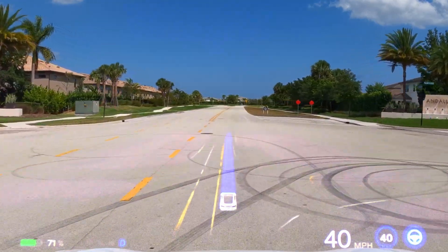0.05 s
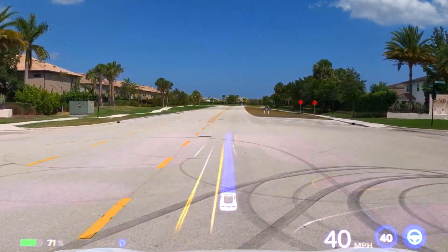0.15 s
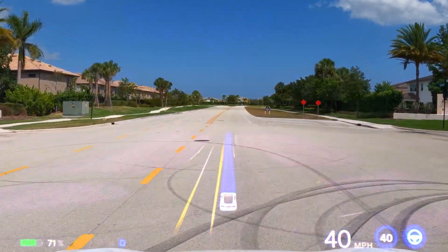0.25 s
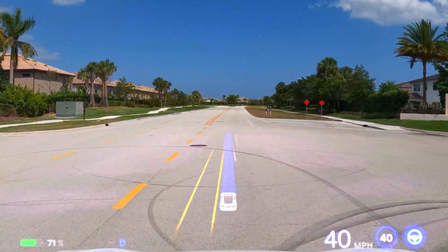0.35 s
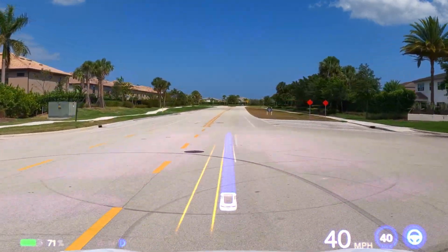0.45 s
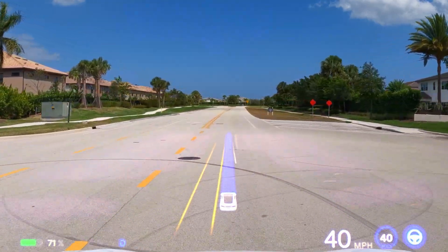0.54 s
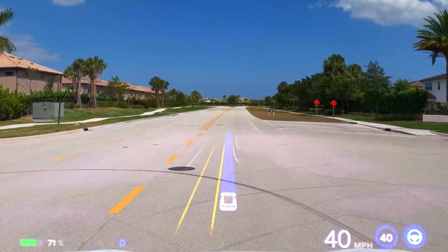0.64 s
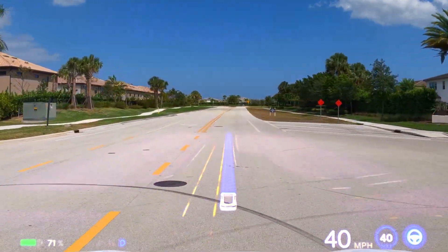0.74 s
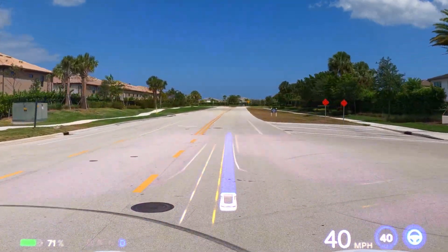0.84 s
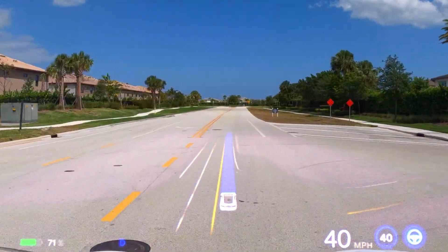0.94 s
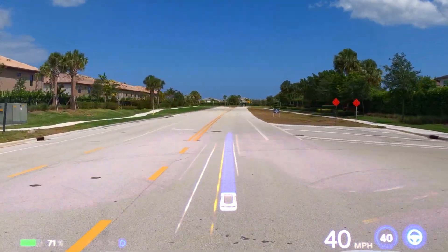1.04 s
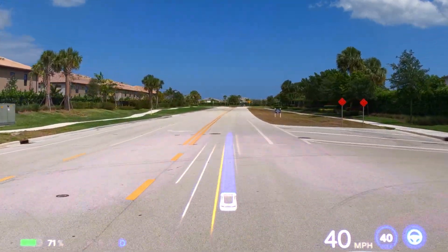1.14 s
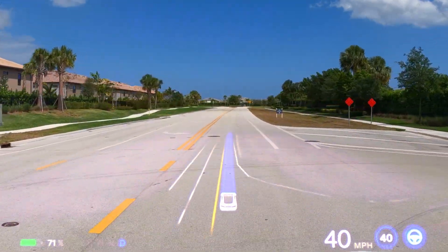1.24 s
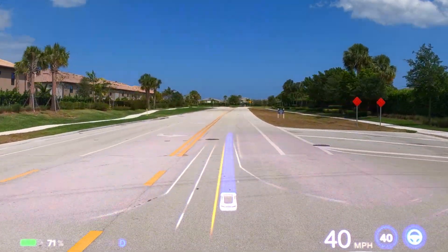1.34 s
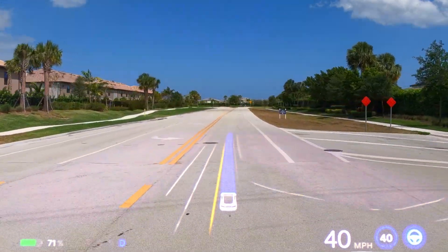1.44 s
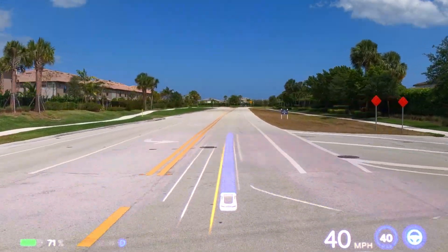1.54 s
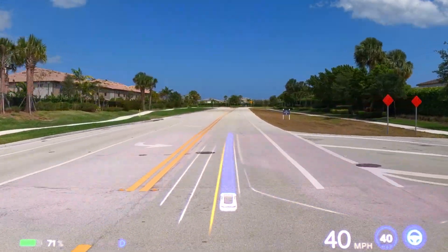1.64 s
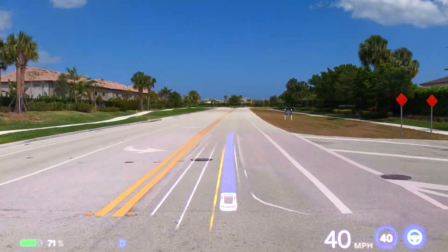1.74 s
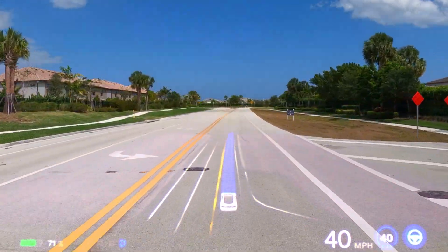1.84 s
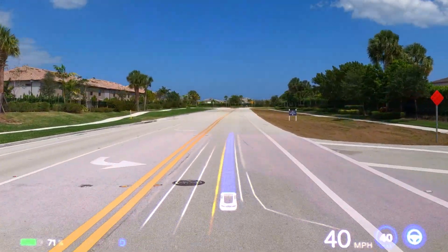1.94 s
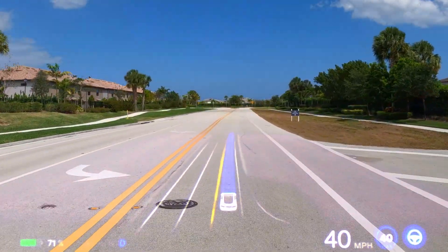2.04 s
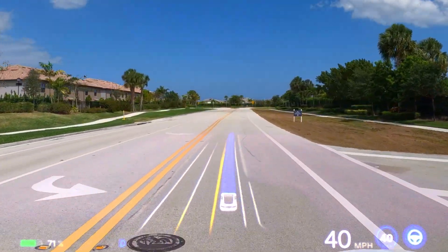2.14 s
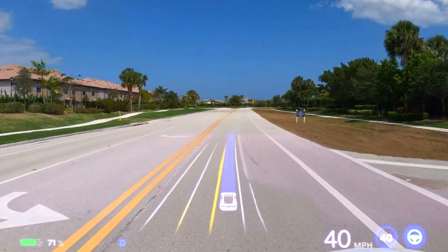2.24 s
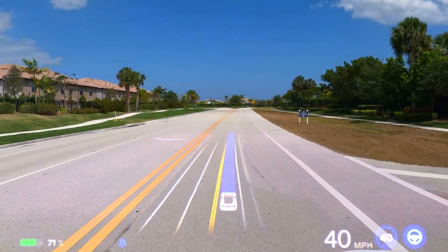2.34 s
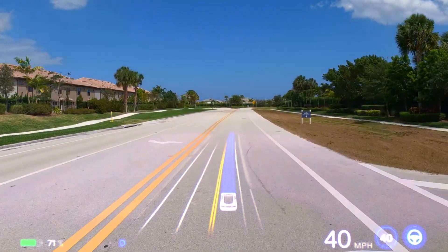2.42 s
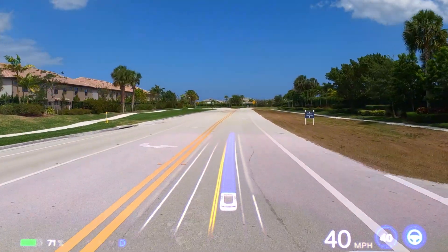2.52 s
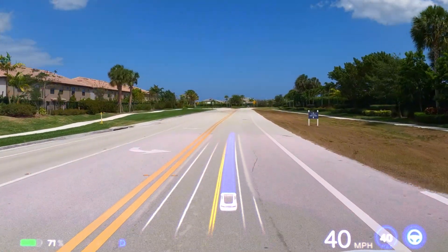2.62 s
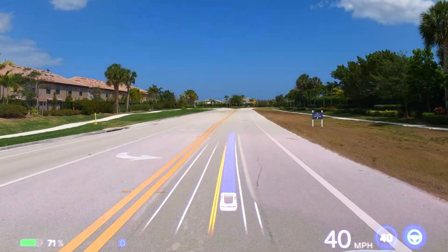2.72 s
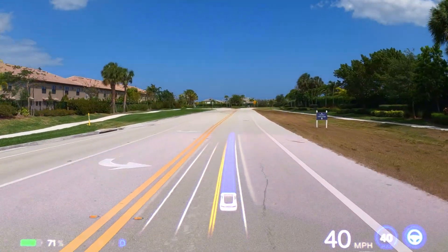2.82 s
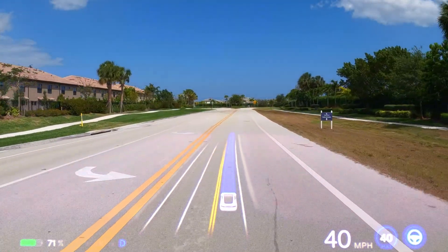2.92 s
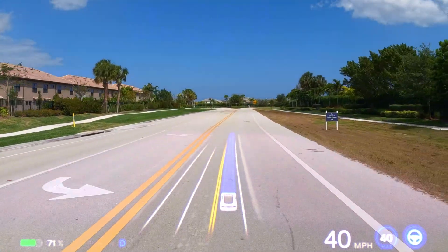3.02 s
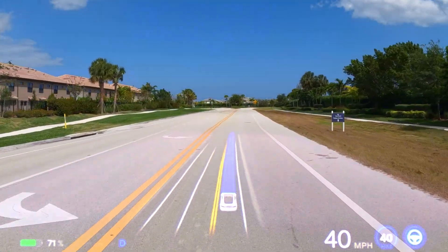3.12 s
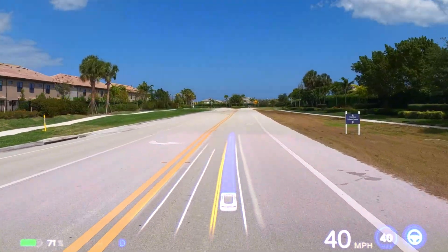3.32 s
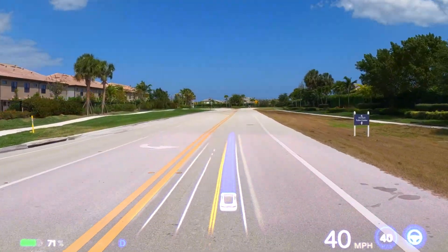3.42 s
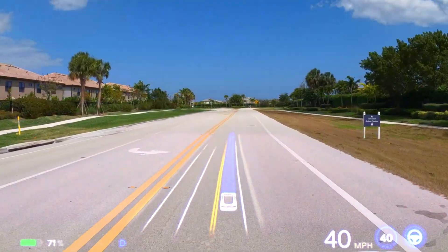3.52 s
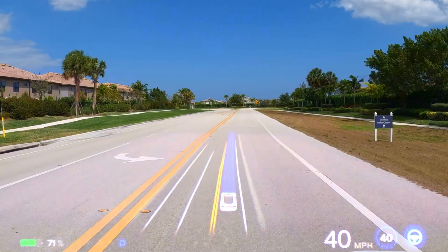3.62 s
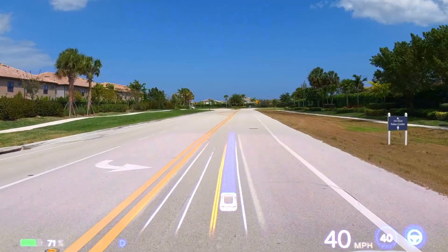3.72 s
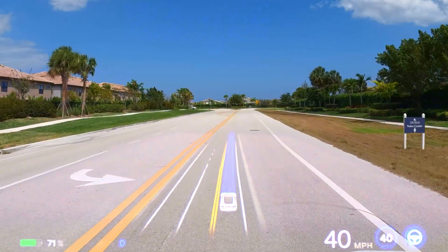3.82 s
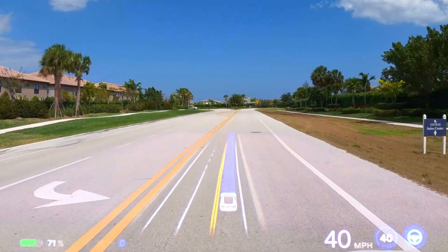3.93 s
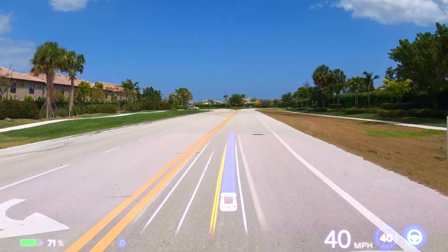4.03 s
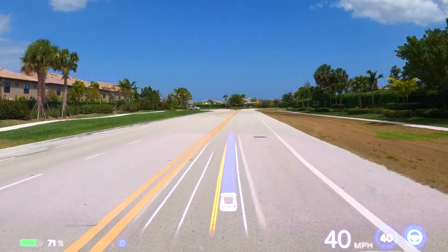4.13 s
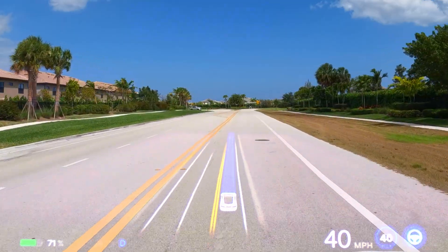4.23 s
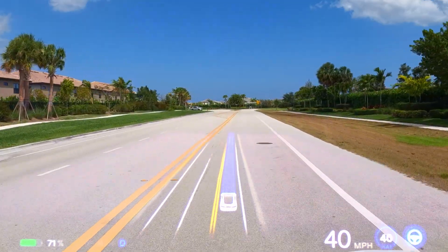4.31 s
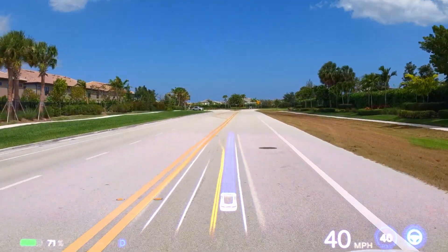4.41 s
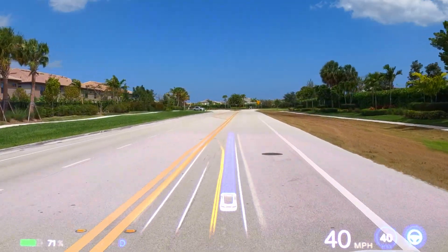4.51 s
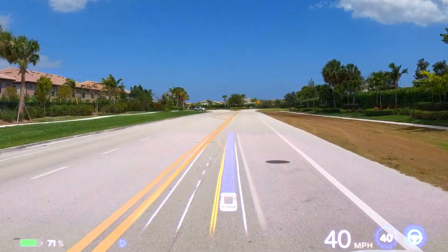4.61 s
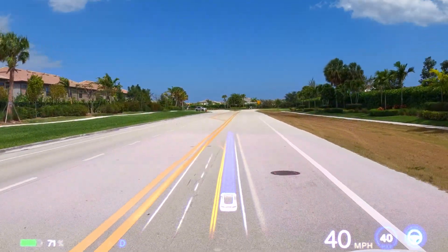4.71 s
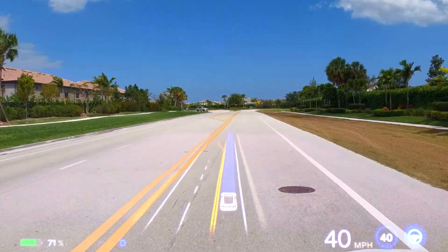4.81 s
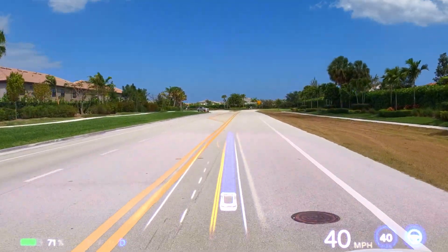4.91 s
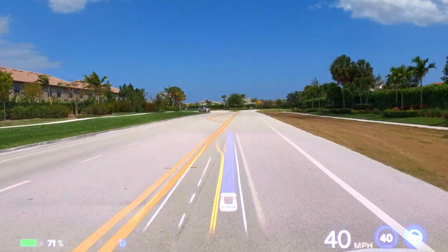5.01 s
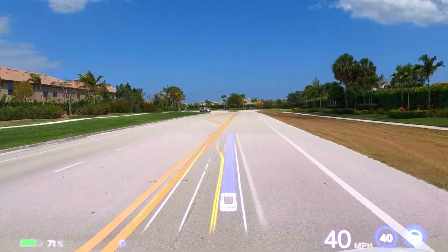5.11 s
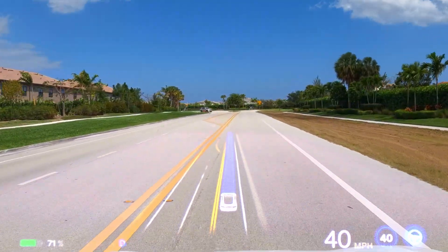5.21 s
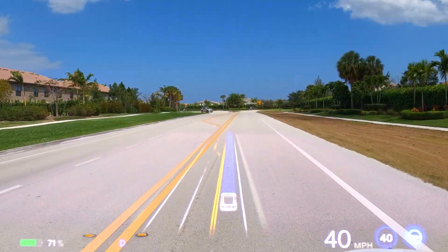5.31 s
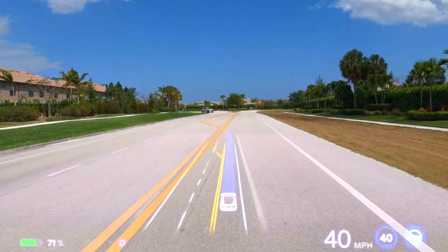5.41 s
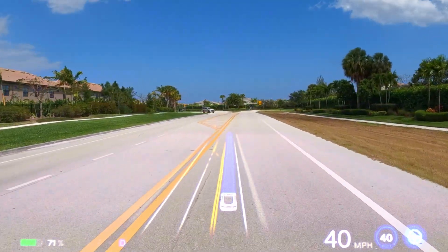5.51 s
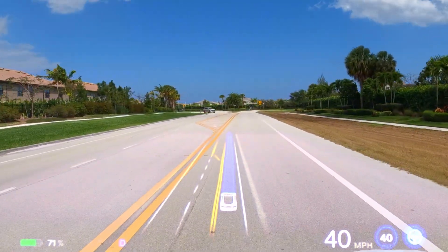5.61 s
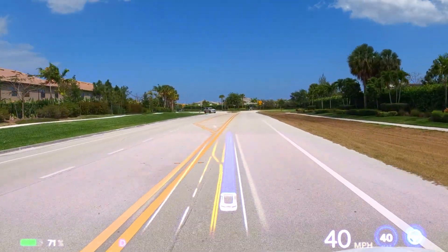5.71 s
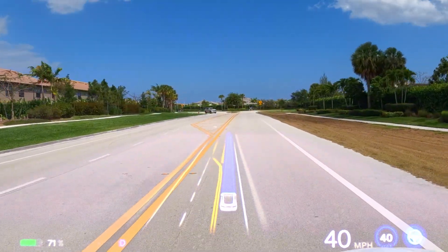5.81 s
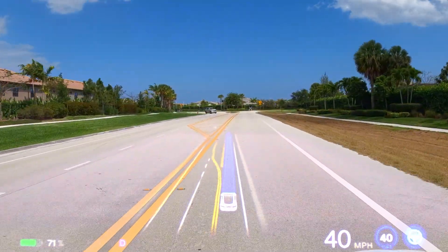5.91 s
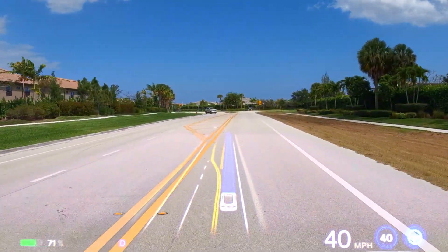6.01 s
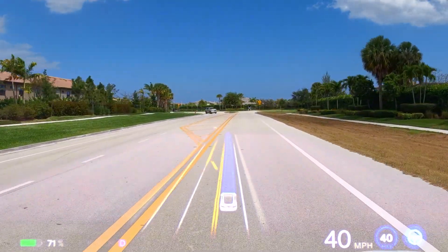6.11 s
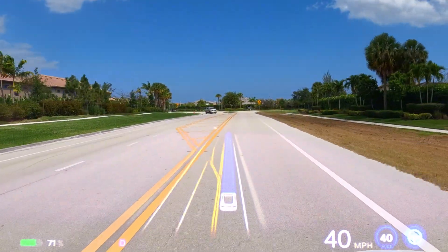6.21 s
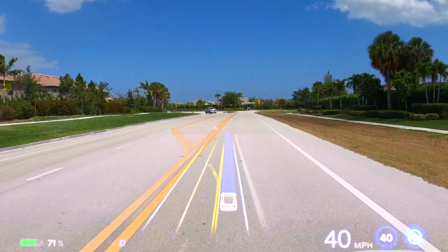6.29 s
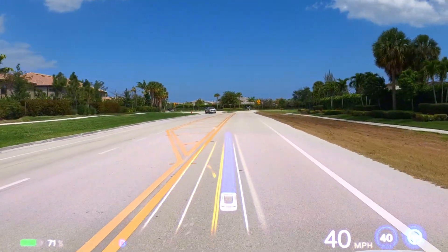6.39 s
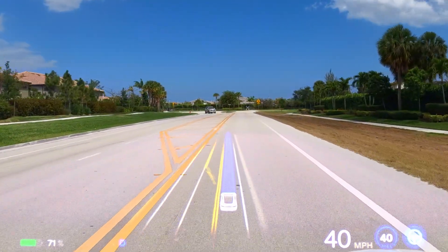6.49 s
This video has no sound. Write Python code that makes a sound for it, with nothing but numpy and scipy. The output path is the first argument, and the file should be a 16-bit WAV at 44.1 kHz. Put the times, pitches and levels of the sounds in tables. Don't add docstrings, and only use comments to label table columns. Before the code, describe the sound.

Steady deep road rumble in a closed car cabin, muffled thumps over uneven asphalt early and again later, slight plastic ticking, faint wind hiss.

```python
import sys
import numpy as np
from scipy import signal
from scipy.fft import rfft, irfft, next_fast_len
from scipy.io import wavfile
from scipy.ndimage import uniform_filter1d, map_coordinates

SR = 44100
rng = np.random.default_rng(int(sys.argv[2]) if len(sys.argv) > 2 else 0)


def volts_from_db(level):
    exponent = np.asarray(level, float) / 20
    return 10 ** exponent


def dump(signal):
    limited = np.clip(np.atleast_2d(signal).T, -1, 1)
    pcm = np.round(limited * 32767).astype(np.int16)
    wavfile.write(sys.argv[1], SR, pcm)


N = 288855

# (frequency [Hz], density [dB per Hz])
HISS_SPECTRUM = [(1470, -27), (2500, -8), (2820, -0.5), (3290, -4.5), (10700, -8), (14900, -17.5),
                 (15500, -14.5)]
# (frequency [Hz], density [dB per Hz])
WIND_SPECTRUM = [(500, -15), (1000, -14.5), (1500, 2.5), (2200, -6), (3200, -19.5), (5000, -27.5),
                 (8000, -48)]
# (time [s], peak [dB], pitch [Hz], width [Hz], t60 [s])
TRIM_TICKS = [(.571, -61, 2600, 700, .015), (.572, -64, 7200, 1400, .015), (1.140, -55, 1950, 700, 0.01),
              (1.1405, -43.5, 1550, 900, 0.0074), (1.893, -53, 1600, 1500, 0.033),
              (1.995, -38, 930, 250, 0.035), (2.022, -43, 900, 300, 0.034),
              (2.172, -49.5, 1100, 350, 0.035), (2.234, -45.5, 1700, 1110, .04),
              (2.236, -53.5, 2900, 1390, 0.054), (2.237, -57, 4000, 2980, 0.09),
              (2.244, -68, 3300, 2000, .07), (4.794, -49, 850, 300, .02), (4.846, -44, 814, 250, 0.017),
              (4.992, -43, 654, 700, .02), (4.9925, -53, 1150, 600, .015)]
# (time [s], peak [dB], cavity ring [dB], length [s], trim rattle [dB])
PATCH_EDGES = [(0.834, -40.5, -4.5, 0.023, -28), (1.022, -47, -5, 0.042, -36), (1.79, -49.5, 1, 0.033, -16),
               (1.895, -47.5, -0.5, 0.03, -25), (1.989, -38, -13, 0.049, -29),
               (2.016, -39, -1.5, 0.033, -34), (2.17, -34.5, -5.5, 0.031, -29.5),
               (4.803, -50, -11, 0.032, -38), (4.817, -37.5, 4, 0.045, -38), (4.989, -32.5, -12, 0.02, -34),
               (5.022, -45, -11, 0.019, -27)]
# (frequency [Hz], density [dB per Hz])
SLAP_SPECTRUM = [(150, -15), (300, 12), (450, 8.5), (650, 2), (920, 3.5), (1200, -6), (1600, -14),
                 (3000, -56)]
# (frequency [Hz], density [dB per Hz])
RATTLE_SPECTRUM = [(800, -29), (1600, 8), (2500, 0), (4000, -8.5), (7000, -10.5), (12000, -31)]
# (frequency [Hz], width [Hz], level [dB])
CAVITY_MODES = [(174, 32, -6), (200.6, 13.7, -3), (217.3, 9.9, -4)]
# (frequency [Hz], density [dB per Hz])
ROAR_SPECTRUM = [(150, -37.5), (240, -11), (310, -14.5), (500, -15.5), (1000, -24.5), (1400, -33.5),
                 (2100, -40), (4000, -69.5)]
# (frequency [Hz], width [Hz], level [dB])
PANEL_MODES = [(266, 31, -4), (361, 32.2, 4), (411, 22.2, 9), (454, 23.5, 1.5), (900, 181, -10.5),
               (1520, 18, -31)]
# (frequency [Hz], width [Hz], level [dB])
FLOOR_MODES = [(75.8, 22, -2), (126.6, 21.6, 1)]
# (frequency [Hz], width [Hz], level [dB])
BOOM_MODES = [(27.9, 10.5, -2.5), (39.37, 7.5, -0.5), (49.8, 11.9, -3.5)]
# (time [s], shake [dB])
ROAD_SHAKE = [(.1, -36), (.55, -41), (.8, -37.5), (1.0, -28), (1.25, -37), (1.6, -38), (1.9, -29.5),
              (2.3, -32), (2.55, -38), (2.9, -34.5), (3.2, -40), (3.85, -39), (4.3, -33), (4.7, -37.5),
              (5.1, -33.5), (5.55, -40), (6.45, -39), (6.55, -45)]
# (crest time [s], boom [dB], length [s])
BODY_HEAVES = [(.23, -41, 0.032), (.4, -41, .05), (.96, -31, 0.055), (1.085, -26.5, 0.039),
               (1.18, -29, 0.028), (1.37, -28.5, 0.066), (1.48, -31, 0.054), (1.64, -43, 0.026),
               (1.845, -27, 0.076), (2.03, -28.5, 0.034), (2.195, -23.5, 0.029), (2.39, -34.5, 0.027),
               (2.97, -32, 0.044), (3.32, -32, 0.039), (3.45, -34, 0.079), (4.35, -37, 0.044),
               (4.5, -38, 0.036), (4.77, -32.5, .04), (4.86, -29, 0.043), (5.03, -25.5, 0.094),
               (5.3, -31.5, 0.039), (5.445, -33.5, 0.042), (6.21, -36.5, 0.049), (6.46, -38, 0.069)]
# (crest time [s], drumming [dB], length [s])
FLOOR_KNOCKS = [(.11, -37, 0.052), (.275, -33.5, 0.043), (.86, -30, 0.043), (.95, -36.5, 0.046),
                (1.07, -27, 0.082), (1.53, -33.5, .05), (1.62, -36.5, 0.037), (1.82, -38, 0.067),
                (1.92, -36.5, 0.046), (2.04, -29.5, .06), (2.16, -34, 0.1), (2.245, -23, 0.045),
                (2.31, -30.5, 0.041), (2.54, -41, 0.064), (2.68, -39, .05), (2.85, -40.5, 0.026),
                (3.22, -37.5, 0.071), (3.66, -37.5, 0.033), (3.79, -42, 0.041), (3.95, -42, .06),
                (4.15, -40, 0.055), (4.59, -39.5, .04), (4.68, -39.5, 0.035), (4.87, -31, 0.045),
                (4.96, -30.5, 0.074), (5.06, -31, 0.068), (5.1, -36, .03), (5.4, -45, 0.044),
                (5.89, -42, 0.026), (5.95, -38.5, 0.081)]


def unit(x):
    return x / np.sqrt(np.mean(x ** 2) + 1e-20)


def colour(points):
    hz, db = np.transpose(points)
    return lambda f: volts_from_db(np.interp(np.log(f + 1), np.log(hz + 1), db))


def resonances(modes):
    def response(f):
        total = 0
        for k, (hz, width_hz, db) in enumerate(modes):
            damping = 1j * f * width_hz
            total = total + (-1) ** k * volts_from_db(db) * damping / (hz * hz - f * f + damping)
        return total
    return response


def filtered(x, response):
    m = next_fast_len(len(x) + 8192)
    spectrum = rfft(x, m) * response(np.fft.rfftfreq(m, 1 / SR))
    return irfft(spectrum, m)[:len(x)]


def wobble(rate_hz):
    knots = rng.standard_normal(int(N * rate_hz / SR) + 4)
    return map_coordinates(knots, [np.arange(N) * rate_hz / SR])


def patchy(response, depth_db):
    z = signal.stft(rng.standard_normal(N), nperseg=1024)[2]
    field = uniform_filter1d(rng.standard_normal(z.shape), size=4, axis=0)
    field = uniform_filter1d(field, size=5, axis=1)
    noise = signal.istft(z * volts_from_db(depth_db * unit(field)), nperseg=1024)[1][:N]
    return unit(filtered(noise, response))


def shaken(modes, steep_hz, memory_s):
    ring = resonances(modes)
    x = filtered(rng.standard_normal(N), lambda f: ring(f) / (1 + (f / steep_hz) ** 8))
    size = int(memory_s * SR)
    power = np.abs(uniform_filter1d(uniform_filter1d(x ** 2, size), size))
    return unit(x / np.sqrt(power + 0.031 * power.mean()))


def swells(rows):
    crest_s, db, length_s = np.transpose(rows)[..., None]
    t = np.arange(0, N + 64, 64) / SR
    bells = np.exp(-(2 * (t - crest_s) / np.clip(length_s, .02, .3)) ** 2)
    power = np.sum(volts_from_db(db) ** 2 * bells, axis=0)
    return np.interp(np.arange(N) / SR, t, power)


def wind_and_hiss():
    wind_db = -74 + 0.43 * wobble(4.0)
    hiss_db = -76.5 + 0.3 * wobble(8.5)
    wind = volts_from_db(wind_db) * patchy(colour(WIND_SPECTRUM), depth_db=1.5)
    return wind + volts_from_db(hiss_db) * patchy(colour(HISS_SPECTRUM), depth_db=3.0)


def trim_ticks():
    out = np.zeros(N + SR)
    t = np.arange(SR // 10) / SR
    for s, db, hz, width_hz, t60_s in TRIM_TICKS:
        tail = 0.2 * rng.standard_normal(len(t)) * volts_from_db(-60 * t / np.clip(t60_s, .003, .1))
        snap = tail + (t == 0)
        panel = resonances([(hz, width_hz, 0)])
        tick = filtered(snap, lambda f: panel(f) ** 3)
        out[round(s * SR):][:len(t)] += volts_from_db(db) * tick / np.abs(tick).max()
    return out[:N]


def patch_bumps():
    slap, ring, shake = np.zeros((3, N + SR))
    t = np.arange(SR // 3) / SR

    def burst(decay_s, rise_s):
        return np.exp(-t / decay_s) * (1 - np.exp(-t / rise_s))

    for s, db, cavity_db, length_s, rattle_db in PATCH_EDGES:
        at = round(s * SR)
        span = slice(at, at + len(t))
        slap[span] += volts_from_db(db - 6) * burst(np.clip(length_s, .005, .1), 0.003)
        ring[span] += volts_from_db(db + cavity_db + 3) * burst(0.069, 0.014)
        shake[span] += volts_from_db(db + rattle_db) * burst(0.096, 0.016)
    grit = patchy(colour(SLAP_SPECTRUM), depth_db=2.5)
    air = shaken(CAVITY_MODES, steep_hz=252, memory_s=0.057)
    buzz = patchy(colour(RATTLE_SPECTRUM), depth_db=0.5) * volts_from_db(1.4 * wobble(140))
    return slap[:N] * grit + ring[:N] * air + shake[:N] * buzz


def tyre_hum(swing_db):
    hum_db = -54.5 + 0.14 * swing_db
    return volts_from_db(hum_db) * shaken(CAVITY_MODES, steep_hz=263, memory_s=0.15)


def tyre_roar(swing_db, knock_power):
    panels = resonances(PANEL_MODES)
    broad = patchy(colour(ROAR_SPECTRUM), depth_db=1.42)
    ringing = patchy(lambda f: panels(f) * f ** 6 / (f ** 6 + 176.0 ** 6), depth_db=1.6)
    flutter_db = 1.5 + 0.45 * wobble(9.1) + 0.62 * wobble(30)
    steady_db, knock_db = -52 + 0.066 * swing_db, -28.5
    gain = np.sqrt(volts_from_db(steady_db) ** 2 + volts_from_db(knock_db) ** 2 * knock_power)
    return gain * unit(volts_from_db(-0.5) * broad + ringing) * volts_from_db(flutter_db)


def floor_drumming(swing_db, knock_power):
    drum = shaken(FLOOR_MODES, steep_hz=163.5, memory_s=0.08) * volts_from_db(1.12 * wobble(13))
    steady_db = -44 + 0.23 * swing_db + 1.5 * wobble(12)
    return np.sqrt(volts_from_db(steady_db) ** 2 + knock_power) * drum


def cabin_boom(shake_db):
    boom = shaken(BOOM_MODES, steep_hz=58.4, memory_s=0.033)
    lurching_db = shake_db + 1.5 * wobble(16)
    return np.sqrt(volts_from_db(lurching_db) ** 2 + swells(BODY_HEAVES)) * boom


def road():
    shake_db = np.interp(np.arange(N) / SR, *np.transpose(ROAD_SHAKE))
    swing_db = shake_db - shake_db.mean()
    knock_power = swells(FLOOR_KNOCKS)
    tyres = tyre_hum(swing_db) + tyre_roar(swing_db, knock_power)
    return tyres + floor_drumming(swing_db, knock_power) + cabin_boom(shake_db)


def scene():
    return (wind_and_hiss() + trim_ticks() + patch_bumps() + road())[None]


def roll_off(x):
    return signal.sosfilt(signal.butter(12, 15630, fs=SR, output="sos"), x)


def record(dry):
    return roll_off(dry)


dry = scene()
out = record(dry)
dump(out)
```